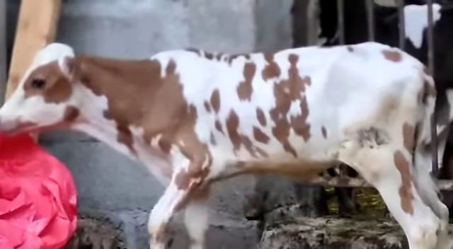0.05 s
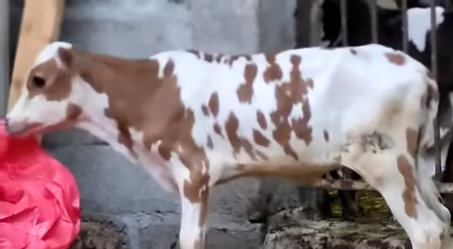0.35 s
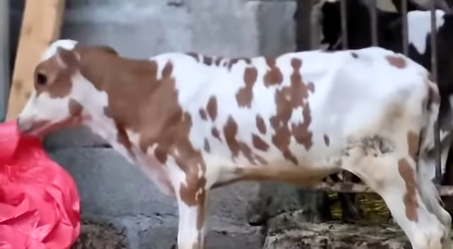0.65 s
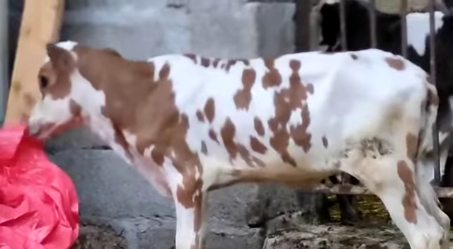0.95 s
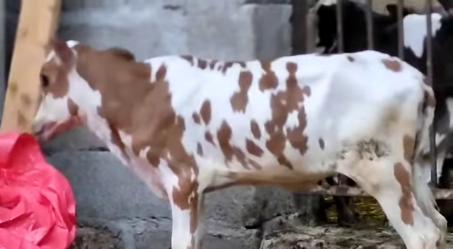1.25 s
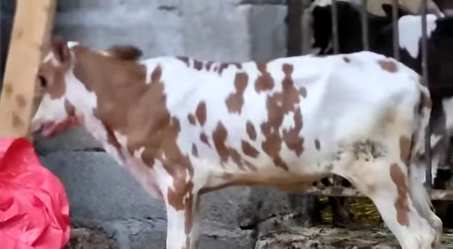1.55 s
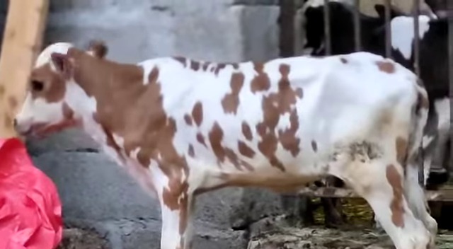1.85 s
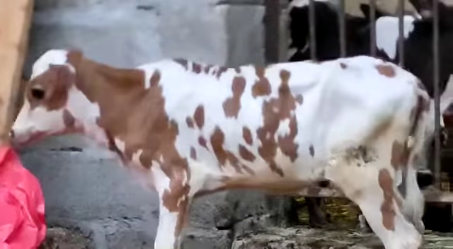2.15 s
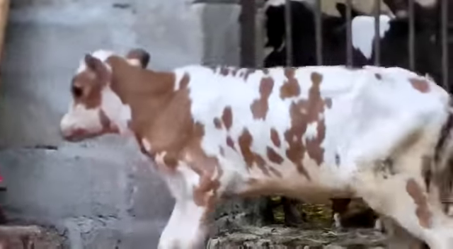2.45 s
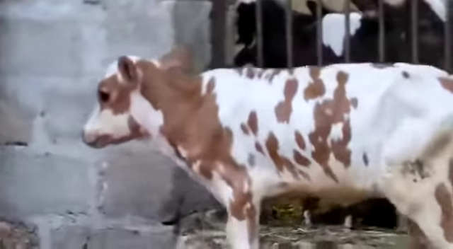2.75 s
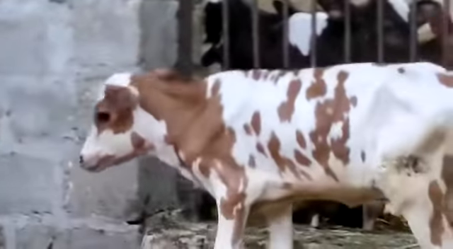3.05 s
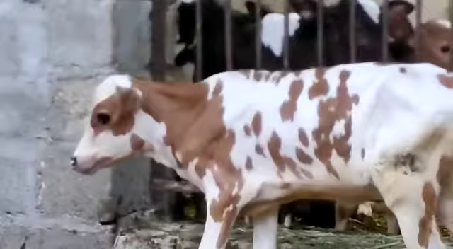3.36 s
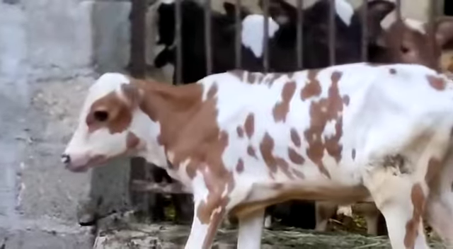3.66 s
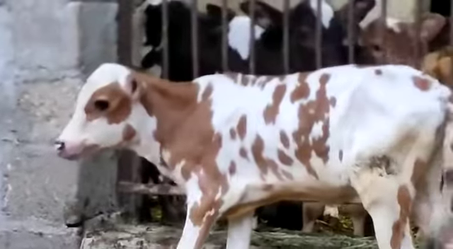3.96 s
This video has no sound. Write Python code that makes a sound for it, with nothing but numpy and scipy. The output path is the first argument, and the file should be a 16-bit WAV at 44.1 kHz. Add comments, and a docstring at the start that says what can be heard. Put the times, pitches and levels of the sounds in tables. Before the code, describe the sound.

Two cattle moo loudly at once in a shed. The deeper voice sinks and fades, while the higher one holds on and ends in a rough grunt. Soft rustles and dry ticks follow close by, over faint rumble and hiss.

```python
"""Two cattle moo at once, their buzzing vocal folds and breath coloured by a concrete shed.
The deeper, brighter voice holds its note, then sinks and dies away.
The higher one dips, recovers, holds on alone and breaks off in a rough grunt.
Then come soft rubbing rustles and a few dry ticks of movement close by.
A low rumble and a faint hiss lie under it all."""
import sys
import numpy as np
from scipy import signal
from scipy.fft import rfft, irfft
from scipy.io import wavfile
from scipy.ndimage import uniform_filter1d

SR = 44100
rng = np.random.default_rng(int(sys.argv[2]) if len(sys.argv) > 2 else 0)


def wrap_up_sound(samples):
    """Save the sound to the file named by the first command line argument, as 16-bit audio."""
    columns = np.atleast_2d(samples).T
    # keep every value between -1 and 1, then stretch to whole-number steps
    tamed = np.clip(columns, -1, 1)
    steps = np.round(tamed * 32767).astype(np.int16)
    wavfile.write(sys.argv[1], SR, steps)


N = 176400
T = np.arange(N) / SR
HZ = np.fft.rfftfreq(N, 1 / SR)

# held note that sinks: time_s, pitch_hz
DEEP_PITCH = [(0, 143.9), (.12, 145.5), (.29, 146.2), (.42, 145.5), (.52, 144), (.62, 140.1), (.7, 131.4),
              (.8, 121.1), (.9, 113.3), (1.0, 102.3), (1.15, 88.75)]
# push behind the call: time_s, level_db, treble_db, breath_db
DEEP_EFFORT = [(0, 0.5, -1.5, -20), (0.169, 0, -0.5, -24.5), (.36, 1, 0, -23.5), (.55, 0, -3, -15),
               (0.661, -0.5, -10.5, -7.5), (.83, 1.5, -18.5, -7), (.95, -2.5, -16.5, -11),
               (1.108, -9.5, -16, -3), (1.202, -22.5, -16.5, -15)]
# swells of the boom near 500 Hz as the shed rings at each ear: time_s, left_db, right_db
DEEP_BOOM = [(0, -20.5, -16.5), (.62, -20, -19), (.69, 11.5, 25.5), (.74, 13, 13.5), (.8, 22, 24.5),
             (.84, 16, 25), (.88, 3, 15), (.96, 6, 7.5), (1.06, 19.5, 14), (1.2, 23, 8)]
# moving chest, throat and nose resonances: width_hz, rows of (time_s, centre_hz, lift_db)
DEEP_VOWEL = [(60, [(0, 1160, 14.5), (.4, 1204, 11.5), (.55, 1157, 13.5), (.72, 1065, 5), (.87, 1066, 12.5),
              (1.0, 1030, 12), (1.2, 1010, 8)]), (130, [(.55, 2310, 0), (.64, 2165, 14), (.7, 2320, 5),
              (1, 2250, -11)]), (55, [(.5, 115, -0.5), (.7, 115, 5.5), (1.0, 105, 6)]),
              (280, [(.45, 1950, -1), (.57, 1950, 2.5), (.7, 1800, 0), (.8, 1800, -0.5)]),
              (700, [(.55, 3100, 0), (.7, 3000, 5), (1.0, 3000, 2)]), (400, [(0, 4300, 3.5), (.45, 4300, 0),
              (.6, 4100, -0.5)]), (900, [(.45, 10370, -2), (.7, 10900, 20.5), (1, 11200, 23.5)])]
# colour of the moo as heard in the shed: freq_hz, left_db, right_db
DEEP_COLOUR = [(148, -49, -48.5), (285, -41, -41.5), (436, -35.5, -33), (603.4, -35, -45),
               (1098, -37.5, -31.5), (1300, -41.5, -41.5), (1570, -47, -38), (1660, -34.5, -35.5),
               (1740, -36.5, -39), (1863, -34.5, -34), (2200, -50, -34), (2170, -31, -33.5),
               (2260, -40.5, -39), (2504, -53, -41), (2600, -53.5, -42.5), (2910, -46.5, -48.5),
               (3080, -45, -35.5), (3400, -46, -35.5), (3420, -52.5, -46.5), (3400, -47, -44.5),
               (3860, -53, -47.5), (4060, -52, -34.5), (4500, -54, -48), (4630, -55, -40),
               (4770, -66.5, -51), (4940, -65.5, -50.5), (6350, -91, -68.5), (7330, -60, -49.5),
               (8550, -91, -79.5), (9400, -73.5, -57.5), (11200, -86, -80.5), (13000, -91.5, -87)]


def deep_moo():
    """The deep, bright voice: the vocal folds slow down and turn breathy as the call dies."""
    return moo(DEEP_PITCH, DEEP_EFFORT, DEEP_BOOM, DEEP_VOWEL, DEEP_COLOUR, DEEP_COLOUR,
               blend=np.ones(N), boom_hz=501, boom_width_hz=61, jitter=0.00096, shimmer=0.074,
               scatter_hz=1172, air_db=-3.5, harmonics=92)


# note that dips and recovers: time_s, pitch_hz
HIGH_PITCH = [(0, 172.8), (.29, 175.4), (.48, 173), (.62, 169.3), (.72, 162.6), (.8, 157.2), (.88, 160.4),
              (.95, 172), (1.03, 179.5), (1.12, 181.5), (1.36, 181.7), (1.58, 183.2), (1.7, 181.7),
              (1.78, 175.6), (1.83, 172.6), (1.87, 165.9), (1.95, 168.2)]
# push behind the call: time_s, level_db, treble_db, breath_db
HIGH_EFFORT = [(0, 0, -0.5, -13.5), (0.301, 1.5, -3, -14.5), (.6, -1.5, 9.5, -9), (.8, -3.5, 9.5, -7.5),
               (1.121, 0, 5, -10), (1.349, 1.5, -0.5, -17), (1.6, 1, 0.5, -13), (1.69, -0.5, 6.5, -11),
               (1.781, -3, 4, -9), (1.833, 0.5, 1.5, 3), (1.871, -8, -17, 5), (1.91, -22.5, -12, -4.5),
               (1.98, -38, -12, -20.5)]
# swells of the boom near 500 Hz as the shed rings at each ear: time_s, left_db, right_db
HIGH_BOOM = [(0.021, 15.5, 20.5), (0.079, 10, 8), (.25, 7.5, 10.5), (.37, 15.5, -3.5), (.45, 20.5, 17.5),
             (0.549, 21.5, 24.5), (0.631, 25, 28.5), (0.681, 16.5, 21.5), (.73, -2, 11), (.88, 1, 3),
             (0.932, 22.5, 22.5), (0.976, 19, 26), (1.001, -4, 12), (1.06, 5, 16), (1.199, -14, 14.5),
             (1.36, -7.5, 7), (1.47, -9, 16.5), (1.56, 6, 20), (1.64, 0, 18), (1.691, 1, 18.5),
             (1.75, 27, -9), (1.776, 10, 10), (1.798, 24.5, 22), (1.835, 10.5, 23), (1.89, 28.5, 26)]
# nasal ring of the upper throat: width_hz, rows of (time_s, centre_hz, lift_db)
HIGH_VOWEL = [(130, [(.95, 2250, -0.5), (1.1, 2380, 9.5), (1.3, 2350, 6), (1.6, 2370, -3.5),
              (1.645, 2370, 7.5), (1.69, 2345, 12), (1.78, 2350, -5), (1.83, 2600, 1.5)]),
              (260, [(1.4, 1790, 2), (1.62, 1886, -9), (1.725, 1660, 13), (1.79, 1660, -12.5)]),
              (700, [(1.77, 1500, -3), (1.825, 1506, 3.5), (1.89, 1300, -5.5)]), (450, [(1.0, 3660, -2),
              (1.62, 3750, 2), (1.74, 3970, 2), (1.8, 3550, -3.5)])]
# colour of the opening note as heard in the shed: freq_hz, left_db, right_db
HIGH_ONSET_COLOUR = [(174, -47.5, -47), (360, -56.5, -40.5), (536, -36, -40), (704, -35, -32),
                     (880, -50, -28.5), (1190, -47, -45), (1290, -51, -29), (1510, -43.5, -41.5),
                     (1850, -41, -36), (2060, -53, -43), (2263, -46, -43), (2630, -46, -34),
                     (2530, -57.5, -55), (3160, -52.5, -42.5), (3400, -61.5, -53.5), (3400, -44.5, -45),
                     (4450, -65.5, -57.5), (6300, -83.5, -71.5), (7300, -85, -65), (8300, -90, -89.5)]
# colour of the held note, whose new pitch meets the shed differently: freq_hz, left_db, right_db
HIGH_HELD_COLOUR = [(182, -50.5, -49), (393, -43.5, -51), (520, -38, -38), (720, -50, -37), (900, -47, -40),
                    (1080, -54, -46.5), (1270, -42.5, -32), (1770, -37.5, -47), (1821, -41, -38.5),
                    (2110, -44.5, -51.5), (2313, -60, -39), (2477, -45, -39), (2760, -65, -54),
                    (3145, -49, -54.5), (3278, -60.5, -52.5), (3720, -63, -56.5), (3660, -61, -48.5),
                    (4040, -64, -61), (4120, -69, -61), (4450, -77, -67.5), (6500, -87, -76.5),
                    (7300, -85.5, -68.5), (8300, -102.5, -104.5), (10200, -98, -89)]
# crossfade from the opening colour (1) to the held colour (0): time_s, onset_share
HIGH_BLEND = [(.55, 0.94), (1.05, 0.01)]


def high_moo():
    """The higher voice: its colour shifts mid-call, and unsteady folds end it in a grunt."""
    return moo(HIGH_PITCH, HIGH_EFFORT, HIGH_BOOM, HIGH_VOWEL, HIGH_ONSET_COLOUR, HIGH_HELD_COLOUR,
               blend=curve(HIGH_BLEND, T)[0], boom_hz=518, boom_width_hz=90, jitter=0.00063,
               shimmer=0.12, scatter_hz=1180, air_db=-1, harmonics=60)


# colour of air rushing past the vocal folds: freq_hz, gain_db
BREATH_COLOUR = [(60, -45.5), (250, 2), (450, -1), (1800, -9.5), (2600, -5.5), (3700, 8), (4800, 7.5),
                 (7000, 2.5), (11500, 8.5), (14000, 1.5)]
TREBLE_HZ, EAR_LEAD_S = 2900, .00005
RASP_SHARE, RASP_HZ = .015, 70  # pitch unsteadiness at breath_db = 0, and its rate
SWELL_DB, SWELL_FULL_HZ, MEAN_SWELLS_PER_S = 4.5, 1780, 2.188


def moo(pitch, effort, boom, vowel, onset_colour, held_colour,
        blend, boom_hz, boom_width_hz, jitter, shimmer, scatter_hz, air_db, harmonics):
    """Vocal-fold harmonics and puffs of air; the walls colour them and scatter the phases at each ear."""
    n = min(N, int(effort[-1][0] * SR))
    t, onset_share = T[:n], blend[:n]
    level_db, treble_db, breath_db = curve(effort, t)
    boom_db = curve(boom, t)
    resonances = [(width, *curve(rows, t)) for width, rows in vowel]
    waver = jitter * wander(20.4)[:n]
    rasp = RASP_SHARE * amp(breath_db) * wander(RASP_HZ)[:n]
    pitch_hz = curve(pitch, t)[0] * (1 + waver + rasp)
    phase = 2 * np.pi * np.cumsum(pitch_hz) / SR
    in_boom = lambda f: np.exp(-((f - boom_hz) / boom_width_hz) ** 2)
    in_treble = lambda f: 1 - 1 / (1 + (f / TREBLE_HZ) ** 6)

    voice = np.zeros((2, N))
    for k, (start, scatter, sway, pace) in enumerate(rng.uniform(-np.pi, np.pi, (harmonics, 4)), 1):
        hz, mean_hz = k * pitch_hz, k * pitch_hz.mean()
        left_lead = 2 * np.pi * mean_hz * EAR_LEAD_S + scatter * min((mean_hz / scatter_hz) ** 3, 1)
        ring = sum(db * np.exp(-((hz - centre) / width) ** 2) for width, centre, db in resonances)
        tone = onset_share * colour(onset_colour, hz) + (1 - onset_share) * colour(held_colour, hz)
        # each harmonic swells and fades on its own, more so the higher it lies
        depth_db = SWELL_DB * min((mean_hz / SWELL_FULL_HZ) ** 2, 1)
        swell = depth_db * np.sin(sway + (2 * np.pi + pace) * MEAN_SWELLS_PER_S * t)
        gain = amp(tone + level_db + treble_db * in_treble(hz) + boom_db * in_boom(hz) + ring + swell)
        voice[:, :n] += gain * np.cos(k * phase + start + np.array([[left_lead], [0]]))
    voice[:, :n] *= 1 + shimmer * wander(40)[:n]

    # the breath pulses once per cycle of the folds
    puffs = rng.standard_normal((2, N)) * np.sqrt(SR / pitch_hz.mean()) / 2
    puffs[:, :n] *= unit(1 + 0.43 * np.cos(phase)) * amp(level_db + breath_db + air_db)
    puffs[:, n:] = 0
    smooth_colour = uniform_filter1d(colour(held_colour, HZ), size=1600)
    breath = shaped(puffs, smooth_colour + colour(BREATH_COLOUR, HZ))
    # it follows the voice's treble fully and the boom lightly
    top = irfft(rfft(breath) * in_treble(HZ), N)[:, :n]
    body = irfft(rfft(breath) * in_boom(HZ), N)[:, :n]
    breath[:, :n] += top * (amp(treble_db) - 1) + body * (amp(0.17 * boom_db) - 1)
    return voice + breath


# reverb decay: freq_hz, t60_s
SHED_DECAY = [(150, .33), (500, .3), (2000, .34), (8000, .25)]
# reverb amount, and how far its peaks and dips are evened out: freq_hz, wet_db, even_share
SHED_WET = [(150, -22, 0), (420, -11, 0), (560, -11, 0), (680, -4, .9), (850, 1, .95), (1200, 2, .95),
            (3000, 3, .9), (9000, 3, .7)]
SHED_ATTACK_S, SHED_FADE_S = 0.00573, .13


def shed(x):
    """Direct sound and a short diffuse tail at each ear: glides smear, held notes keep their colour."""
    hz, t, noise = signal.stft(rng.standard_normal((2, N)), SR, nperseg=256)
    decay = amp(-60 * t / colour(SHED_DECAY, hz)[0][:, None])
    tail = signal.istft(noise * decay, SR, nperseg=256)[1][:, :N]
    tail *= np.minimum(T / SHED_ATTACK_S, 1)
    wet_db, even_share = colour(SHED_WET, abs(np.fft.fftfreq(N, 1 / SR)))
    room = 1 + amp(wet_db) * np.fft.fft(tail / np.linalg.norm(tail[0]))
    ripple = np.exp(signal.hilbert(even_share * np.log(abs(room))).conj())  # minimum phase
    echoes = np.fft.ifft(room / ripple).real * np.exp(-(T / SHED_FADE_S) ** 2)
    return signal.fftconvolve(x, echoes, axes=1)[:, :N]


# swells of movement, before panning: time_s, level_db
RUSTLE_LEVEL = [(1.9, -63.5), (2.04, -60), (2.15, -55.5), (2.24, -50), (2.34, -49.5), (2.43, -54.5),
                (2.53, -49), (2.62, -57.5), (2.79, -63), (2.87, -54.5), (2.94, -60), (3.06, -53),
                (3.22, -52), (3.33, -54), (3.48, -46), (3.58, -54), (3.65, -50.5), (3.75, -51.5),
                (3.81, -60.5), (3.92, -67), (4, -55.5)]
# colour of the rubbing and the ticks: freq_hz, gain_db
RUSTLE_COLOUR = [(240, -28), (400, -2), (437, -4.5), (663, 0), (817, -11), (880, -8), (1150, -6.5),
                 (1600, -2), (3900, -2), (5240, -6.5), (7170, -1.5), (8440, -13), (9800, -9),
                 (14000, -14.5)]
# bass roll-off for both: freq_hz, gain_db
RUSTLE_LOW_CUT = [(100, -41.5), (300, -7.5), (600, 0)]
# likeness of the two ears: freq_hz, correlation
RUSTLE_STEREO = [(60, 0.92), (230, 0.99), (900, 0.47), (3510, -0.015), (13600, 0.011)]


def rustle(grains_per_s, grain_spread_db, grain_mix, flutter_db):
    """Rubbing noise with tiny crackles swells and fades with each movement."""
    sizes = amp(grain_spread_db * np.minimum(rng.exponential(1, (2, N)), 4))
    crackles = sizes * rng.standard_normal((2, N))
    crackles *= rng.random((2, N)) < grains_per_s / SR
    rub = pair(*(rng.standard_normal((2, N)) + grain_mix * unit(crackles)), RUSTLE_STEREO)
    rub = unit(shaped(rub, colour(RUSTLE_COLOUR, HZ) + colour(RUSTLE_LOW_CUT, HZ)))
    return rub * amp(curve(RUSTLE_LEVEL, T) + flutter_db * wander(35))


# ticks and scuffs, before panning: start_s, level_db, decay_s, tilt_db_per_octave
TICKS = [(1.98, -46.5, 0.0076, -11.5), (2.227, -51, 0.017, -7), (2.253, -50, .01, -6),
         (2.455, -54, .006, 2), (2.865, -46, 0.01, -4), (3.213, -50, 0.024, -6.5), (3.372, -52, 0.013, -12),
         (3.557, -45.5, 0.0069, -4), (3.604, -46.5, 0.019, -1), (3.637, -45, 0.009, -3),
         (3.703, -49, .012, 0), (3.965, -40, 0.0022, 7.5)]


def ticks():
    """Short dry bursts of noise where something catches."""
    out = np.zeros((2, N))
    tone_db = colour(RUSTLE_COLOUR, HZ) + colour(RUSTLE_LOW_CUT, HZ)
    for start_s, level_db, decay_s, tilt in TICKS:
        noise = rng.standard_normal((2, N)) + 0.79 * rng.standard_normal(N)  # wide plus centred
        burst = unit(shaped(noise, tone_db + tilt * np.log2(1 + HZ / 1000)))
        envelope = (T >= start_s) * np.exp(-abs(T - start_s) / decay_s)
        out += burst * amp(level_db) * envelope
    return out


# colour of the shed's air: freq_hz, gain_db
AIR_COLOUR = [(53, -22.5), (90, 9), (124, -2), (276, -1.5), (378, -5), (498, -6), (809, -9.5),
              (4570, -28.5), (5300, -26.5), (6690, -31), (14000, -32.5)]
# colour of the distant rumble: freq_hz, gain_db
RUMBLE_COLOUR = [(15, -18.5), (30, -18), (39, 2.5), (48, -12), (65, -12), (100, -15.5), (160, -21),
                 (300, -24), (700, -64.5)]
# likeness of the two ears: freq_hz, correlation
ROOM_STEREO = [(30, 0.9), (200, 0.97), (700, 0.47), (3000, 0.21)]


def room_tone(air_db, rumble_db):
    """The shed's faint hiss over a distant rumble, held at a steady level."""
    air = shaped(pair(*rng.standard_normal((2, N)), ROOM_STEREO), colour(AIR_COLOUR, HZ))
    rumble = shaped(pair(*rng.standard_normal((2, N)), ROOM_STEREO), colour(RUMBLE_COLOUR, HZ))
    running_rms = np.sqrt(uniform_filter1d((rumble ** 2).mean(0), size=5000))
    return amp(air_db) * unit(air) + amp(rumble_db) * rumble / running_rms


def amp(db):
    """Decibels to gain."""
    return 10 ** (np.asarray(db) / 20)


def unit(x):
    """Scales to rms 1."""
    return x / np.sqrt(np.mean(x ** 2) + 1e-20)


def curve(rows, at):
    """A table's columns as straight-line envelopes over its first."""
    x, *columns = np.transpose(rows)
    return np.array([np.interp(at, x, c) for c in columns])


def colour(rows, hz):
    """A table's columns, read on a log-frequency axis."""
    f, *columns = np.transpose(rows)
    at = np.log(hz + 1)
    return np.array([np.interp(at, np.log(f + 1), c) for c in columns])


def shaped(x, db):
    """Filters by a gain in dB per frequency."""
    return irfft(rfft(x) * amp(db), N)


def wander(rate_hz):
    """Smooth random motion of rms 1."""
    return unit(irfft(rfft(rng.standard_normal(N)) / (1 + (HZ / rate_hz) ** 2), N))


def pair(a, b, likeness):
    """Two ears from two unrelated signals, with the given correlation per frequency."""
    c = np.clip(colour(likeness, HZ)[0], -1, 1)
    return np.array([a, irfft(c * rfft(a) + np.sqrt(1 - c ** 2) * rfft(b), N)])


# pan of the rustle and ticks: left_db, right_db
MOVEMENT_PAN_DB = [-3, 4.5]


def scene():
    """Two calls in the shed, then dry movement close by on the right, over room tone."""
    calls = deep_moo() + high_moo()
    movement = rustle(grains_per_s=450, grain_spread_db=4, grain_mix=0.67, flutter_db=0.5) + ticks()
    movement *= amp(MOVEMENT_PAN_DB)[:, None]
    return shed(calls) + movement + room_tone(air_db=-59, rumble_db=-50)


def record(dry):
    """A steep low-pass trims the highest treble."""
    low_pass = signal.firwin(511, cutoff=14280, window=("kaiser", 9), fs=SR)
    return signal.oaconvolve(dry, low_pass[None], "same")


dry = scene()
out = record(dry)
wrap_up_sound(out)
```